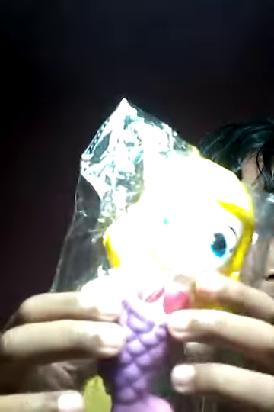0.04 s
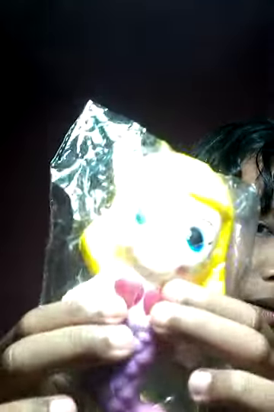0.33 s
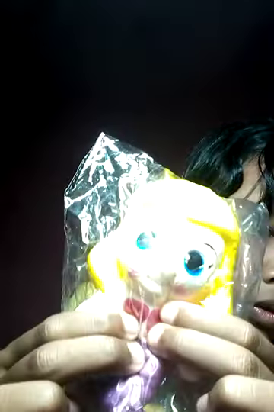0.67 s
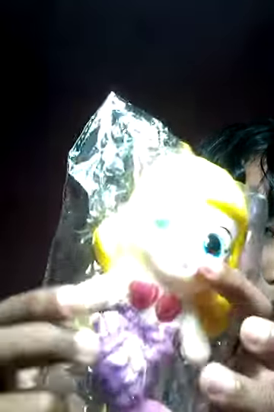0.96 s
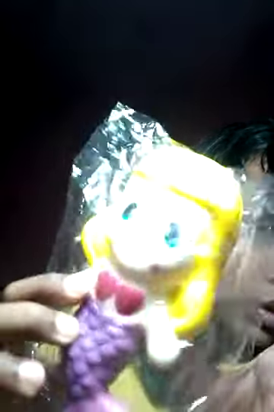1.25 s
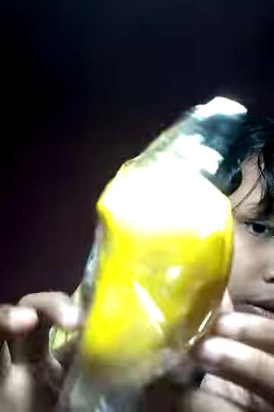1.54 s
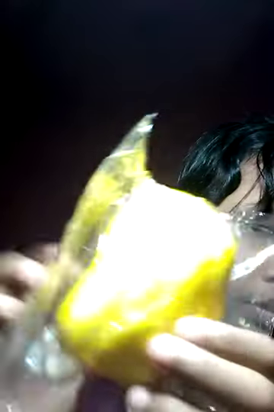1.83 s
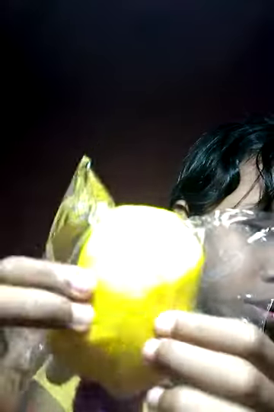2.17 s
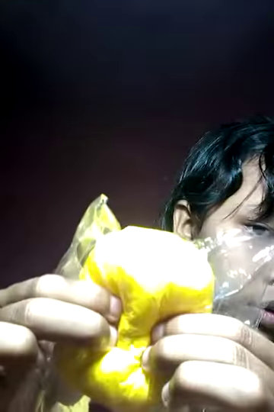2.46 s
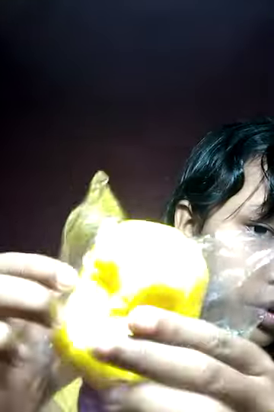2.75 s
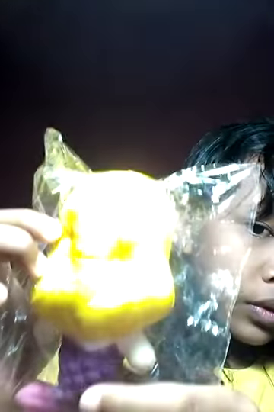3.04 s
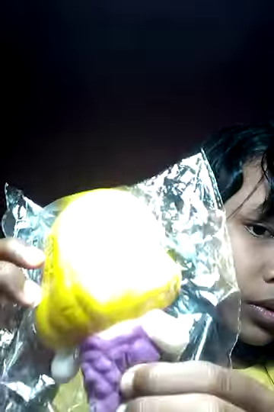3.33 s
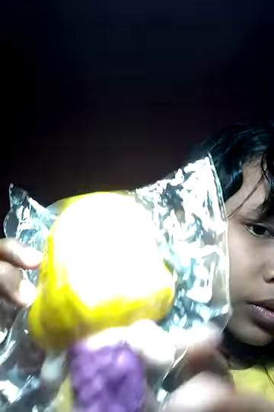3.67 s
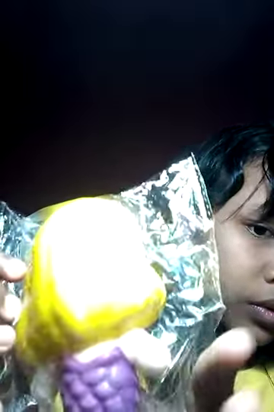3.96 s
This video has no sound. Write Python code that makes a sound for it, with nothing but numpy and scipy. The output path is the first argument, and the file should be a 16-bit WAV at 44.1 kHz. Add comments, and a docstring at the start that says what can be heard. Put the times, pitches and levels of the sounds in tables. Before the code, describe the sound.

A thin plastic bag crinkles close to the microphone from the start, with sharp snaps over dense crackling and a duller rustle as a soft toy inside is squeezed and turned. It swells around 1.7 and 2.1 seconds. At about 2.7 seconds it pauses, leaving a quiet room and a few tiny ticks. The crinkling returns sharply at 3 seconds and surges loudest just before 4 seconds.

```python
"""A thin plastic bag crackles around a soft toy as it is squeezed and turned, close to a small microphone.
Creases buckle in sharp snaps over a dense crackle and the duller rustle of the whole sheet.
Film slides on film, slack patches flop and fingers rub the toy; the hands rest once.
Behind it is a quiet room with a faint mains hum.
The microphone rings near 4 kHz and overloads on the hardest snaps."""
import sys
import numpy as np
from scipy import signal
from scipy.fft import rfft, irfft
from scipy.io import wavfile
from scipy.ndimage import uniform_filter1d

SR = 44100
rng = np.random.default_rng(int(sys.argv[2]) if len(sys.argv) > 2 else 0)


def store_pcm(level_fs):
    """Save levels as 16-bit WAV."""
    pcm = np.round(np.clip(level_fs, -1, 1) * 32767).astype(np.int16)
    wavfile.write(sys.argv[1], SR, np.atleast_2d(pcm).T)


N = 176400

# colour of the quiet room: frequency_hz, relative_db
ROOM_TONE_COLOUR = [(30, -19), (70, -16), (110, -8), (250, 4), (500, 1.5), (720, 2), (900, -2), (1200, 3),
                    (1900, -9.5), (4200, -19), (8000, -30), (16000, -18)]
# how long the walls reverberate: frequency_hz, t60_s
ROOM_DECAY = [(150, 0.5), (1000, 0.32), (4000, 0.17), (9000, 0.15), (16000, 0.18)]
# fingers rubbing the toy through the bag: start_s, length_s, peak_db
FINGER_RUBS = [(.96, 0.17, -40), (1.245, .04, -44), (1.692, .11, -45), (2.06, 0.098, -40)]
# dull colour of that rubbing: frequency_hz, relative_db
RUB_COLOUR = [(30, -37), (100, -14), (170, -4.5), (300, 1), (500, -1), (1000, -20), (4000, -50)]
# hiss of film sliding on film: frequency_hz, relative_db
SLIDE_COLOUR = [(30, -46), (150, -7), (700, -1.5), (1300, -3.5), (2000, -1.5), (3000, 0.5), (4200, -1.5),
                (5500, 1), (8500, 1), (11000, -8), (16000, -15)]
# broad patches of film flopping under the fingers: start_s, peak_db, pitch_hz
FILM_FLOPS = [(.598, -28, 736), (.864, -33, 294), (1.029, -29, 530), (1.043, -31, 270), (1.147, -27, 667),
              (1.248, -27.5, 328), (2.066, -22, 630), (2.109, -23, 720), (2.982, -25.5, 706),
              (3.001, -23.5, 402), (3.027, -27.5, 216), (3.2, -26.5, 695), (3.558, -23.5, 356),
              (3.562, -22.5, 650)]
# a buckling crease as the close microphone hears it: frequency_hz, relative_db
CREASE_COLOUR = [(30, -51), (100, -33), (200, -25.5), (400, -17), (550, -12.5), (720, -10), (850, -13),
                 (1300, -3.5), (1650, -15), (2000, -24), (2400, -8.5), (2750, -13.5), (3200, -6.5),
                 (3750, -1), (4400, 3), (5100, -9), (6400, -10.5), (8600, -8.5), (10000, -16), (11500, -22),
                 (13000, -22.5), (16000, -36.5)]
# how hard the bag is crumpled, in relative levels: time_s, crackle_db, rustle_db
CRUMPLE_EFFORT = [(0.0, -30.5, -40.5), (0.091, -36.5, -50), (0.135, -43.5, -44), (0.165, -32.5, -48),
                  (0.239, -17.5, -24.5), (0.278, -27, -40), (0.349, -29.5, -42), (0.364, -24.5, -36),
                  (0.454, -27, -40.5), (0.599, -27, -31.5), (0.678, -28, -44.5), (0.753, -20.5, -34.5),
                  (0.803, -25.5, -38.5), (0.838, -17, -32.5), (0.968, -25, -37.5), (1.052, -23.5, -35),
                  (1.122, -27.5, -43.5), (1.147, -28.5, -36), (1.227, -35, -45), (1.262, -25.5, -31.5),
                  (1.292, -26.5, -38), (1.377, -36, -45), (1.432, -32.5, -37), (1.527, -25, -36.5),
                  (1.576, -30.5, -42), (1.586, -27, -35), (1.636, -18, -32), (1.754, -15.5, -25),
                  (1.791, -20, -35.5), (1.826, -20, -28), (1.841, -24, -37), (1.921, -31.5, -51),
                  (1.937, -26, -31), (1.956, -32, -42.5), (2.12, -17.5, -27), (2.135, -21.5, -35),
                  (2.175, -21.5, -31), (2.19, -27, -39), (2.23, -23.5, -31), (2.295, -27.5, -38),
                  (2.484, -29.5, -42), (2.529, -30.5, -33.5), (2.545, -26, -50), (2.574, -32.5, -37),
                  (2.655, -20, -29.5), (2.694, -50, -44), (2.699, -65, -70), (2.963, -54, -55),
                  (2.968, -42, -58), (2.985, -22, -30.5), (3.026, -16.5, -28.5), (3.113, -29, -42.5),
                  (3.128, -23.5, -29), (3.178, -30.5, -41.5), (3.198, -27, -33), (3.228, -32.5, -39),
                  (3.342, -34, -53), (3.357, -25.5, -33), (3.397, -35.5, -42), (3.497, -30, -42),
                  (3.524, -33.5, -46), (3.556, -19, -31), (3.67, -20, -30), (3.79, -27.5, -35.5),
                  (3.9, -35, -43), (3.95, -33, -35), (3.976, -21.5, -27), (3.99, -6, -20.5),
                  (4.0, -7.5, -20.5)]
# single large creases, in relative levels: start_s, level_db, body_db, treble_db
CREASE_SNAPS = [(0.029, -26, -24, 1), (0.041, -7, -36.5, -21), (0.0682, -31, -15, -18),
                (0.1441, -20, -9, -28), (0.1639, -16, -11, -11), (0.171, -8, -9.5, -5.5),
                (0.1788, -10, -22, -5), (0.253, -12.5, -14, -3), (0.2879, -21.5, -14, -2),
                (0.3353, -15.5, -5, -8), (0.353, -19.5, -1, -16), (0.3574, -21, -9, -16),
                (0.3823, -13.5, -15, -11), (0.3878, -13, -6, -4), (0.4027, -14, -10, -1),
                (0.44, -11.5, -8.5, -3.5), (0.4954, -15.5, -20, -18), (0.5294, -21, -12, -12),
                (0.5359, -17.5, -6, -8), (0.5597, -14.5, -9, -5), (0.5643, -15, -17, -5),
                (0.5714, -10, -12.5, -10), (0.6312, -21, -17, 9), (0.6554, -12, -21, -9),
                (0.6808, -20.5, -21, -17), (0.7274, -12.5, -6.5, -13), (0.744, -14.5, -16, -18),
                (0.7544, -15, -6, 0), (0.7673, -8, -13, -0.5), (0.796, -6.5, -19, -11),
                (0.799, -11.5, -37, -16), (0.8273, -13, -14, -12), (0.834, -16, -12, -3),
                (0.8927, -25, -21, -5), (0.9345, -10.5, -9.5, -5), (0.9425, -17, -14, -11),
                (0.9886, -15.5, -5, -5), (1.0343, -21.5, -3, -6), (1.0451, -9, -19, -16),
                (1.0718, -14, -7, -2.5), (1.089, -20, -23, -13), (1.0946, -25.5, -1, -8),
                (1.103, -13.5, -14, -3), (1.1527, -18, -15, -10), (1.1668, -26, -4, -1),
                (1.1803, -13.5, -10, -9), (1.199, -14.5, -16, -9), (1.249, -19.5, -10, -8),
                (1.2603, -14, -21, -18), (1.2815, -13.5, -18, -3.5), (1.2927, -18, -11, -4),
                (1.306, -13, -30, -13), (1.3157, -16.5, -23, -3), (1.3829, -18.5, -14, -6),
                (1.3916, -28, -20, 0), (1.3994, -31, -10, -1), (1.4192, -20, -8, -3),
                (1.4246, -18.5, -15, -2), (1.4297, -19, -21, -4), (1.4543, -22, -13, -4),
                (1.4661, -8, -12.5, -6.5), (1.4704, -19, -19, -6), (1.5237, -11, -11, -10),
                (1.582, -18.5, -28, -2), (1.6054, -14, -10, -5), (1.656, -17, 0, 1), (1.67, -12, -22, -9),
                (1.6872, -17, -21, -2), (1.7019, -8, -8, -3), (1.7343, -12, -14, -11),
                (1.772, -11, -19, -8), (1.778, -12.5, -24, -24), (1.782, -12, -21, -21),
                (1.8229, -10, -11, -23), (1.8367, -16, -16, -16), (1.8603, -12.5, -29, -13),
                (1.8669, -20, -16, -13), (1.8781, -17.5, -9, -14), (1.889, -23, -25, -6),
                (1.911, -20, 3, -10), (1.9141, -19, -18, -11), (1.9273, -21, -18, 2),
                (1.9312, -19, -26, -20), (1.936, -11.5, -30, -9.5), (1.9751, -16, -1, -11),
                (1.984, -16.5, -4, -17), (2.0647, -10, -4.5, -5), (2.0706, -13, -23, -11),
                (2.0778, -15, -18, -20), (2.0963, -12, -9, -10), (2.121, -10, -10, -10),
                (2.1283, -8.5, -13, -12), (2.1696, -16.5, 1, -10), (2.1845, -13.5, -14, -10),
                (2.21, -13, -22, -16), (2.2177, -14.5, -28, -16), (2.2437, -21, -13, -1),
                (2.2847, -19, -13, -9), (2.2899, -23, -14, -21), (2.3242, -15.5, -9, -12),
                (2.3286, -22, -17, -7), (2.3702, -16.5, -20, -6), (2.3823, -20, -24, -2),
                (2.3905, -13.5, -10, -4), (2.4034, -17, -14, -3), (2.4846, -19, -17, -10),
                (2.4876, -16.5, -7, -7.5), (2.5016, -19, -21, -11), (2.5458, -19, -16, -7),
                (2.547, -19.5, -12, -9), (2.5563, -14.5, -12, 5), (2.562, -7, -19, -14),
                (2.5769, -21, 0, -5), (2.6152, -12, -10, -4), (2.6215, -12.5, -14, 2),
                (2.6248, -13.5, -16, -8), (2.6371, -17, -10, -22), (2.6693, -12, -12, -8),
                (2.6777, -18, -16, -1), (2.6825, -21, -10, -3), (2.866, -33, -21, -7),
                (2.9353, -36, -10, -15), (2.957, -29, -2, -8), (2.9819, -17.5, 2, -19),
                (2.9983, -13, 2, -2), (3.0265, -8.5, 5.5, 6.5), (3.1179, -18, -16, -3),
                (3.13, -21, -11, 11), (3.1488, -15, -21, -5), (3.2047, -20, -10, -7),
                (3.252, -16.5, -9, -8), (3.2549, -13.5, -19, -18), (3.26, -14.5, -32, -6),
                (3.2733, -28, -5, -4), (3.2859, -10, -13, 0.5), (3.3062, -26, -19, 0),
                (3.3158, -20.5, -25, -3), (3.3527, -15, -24, -11), (3.3637, -19, -8, -3),
                (3.3879, -22, -25, 1), (3.4105, -17, -5.5, -5), (3.4437, -21, -12, -16),
                (3.463, -27.5, -1, -9), (3.4937, -24, -6, -13), (3.5441, -13, -29, -4),
                (3.5714, -14.5, -18, -2), (3.577, -13, -33, -14), (3.5846, -6.5, -39, -14),
                (3.6215, -17, -20, 12), (3.6335, -10, -19, -16), (3.6581, -18, -6, -6),
                (3.6645, -3, -16, -13.5), (3.6992, -14, -7, -9), (3.7279, -14.5, -12, -21),
                (3.7509, -19, -10, -10), (3.7592, -21, -26, -10), (3.764, -17.5, -16, -9),
                (3.8117, -13.5, -28, -11), (3.8437, -17.5, -18, -8), (3.8932, -22.5, -20, 19),
                (3.92, -32, -15, 3), (3.929, -29, -15, 3), (3.9563, -14.5, -11, -10)]

BODY_EDGE_HZ, TREBLE_EDGE_HZ = 2090, 5660  # the microphone's ring lies between these
USUAL_EFFORT_DB = -26.5  # crackle_db in ordinary handling


def amp(db):
    """Decibels to gain."""
    return 10 ** (np.asarray(db) / 20)


def unit(x):
    """Scales to an energy of one."""
    return x / np.sqrt(np.sum(x ** 2) + 1e-20)


def read(points, hz):
    """Reads a table along a log-frequency axis."""
    table_hz, value = np.transpose(points)
    return np.interp(np.log(hz + 1), np.log(table_hz), value)


def add(mix, start_s, sound):
    """Mixes a sound in at a time."""
    part = mix[round(start_s * SR):][:len(sound)]
    part += sound[:len(part)]


def noise(colour):
    """Steady noise of a given colour, at an RMS of one."""
    spectrum = rfft(rng.standard_normal(N)) * amp(read(colour, np.fft.rfftfreq(N, 1 / SR)))
    return np.sqrt(N) * unit(irfft(spectrum, N))


def steadied(x, span_s):
    """Evens out the slow level of a train of clicks."""
    window = signal.windows.hann(int(span_s * SR))
    power = abs(signal.oaconvolve(x ** 2, window / window.sum(), "same"))
    return x / np.sqrt(power + 1e-3 * np.mean(x ** 2))


def effort():
    """How hard the hands work at each sample: crackle_db, rustle_db."""
    time_s, crackle_db, rustle_db = np.transpose(CRUMPLE_EFFORT)
    t = np.arange(N) / SR
    return np.interp(t, time_s, crackle_db), np.interp(t, time_s, rustle_db)


def room_tone(noise_db=-52, hum_db=-69, hum_hz=100):
    """The room behind the bag: soft steady noise and a faint mains hum."""
    hum = np.sqrt(2) * np.sin(2 * np.pi * hum_hz * np.arange(N) / SR)
    return amp(noise_db) * noise(ROOM_TONE_COLOUR) + amp(hum_db) * hum


def reflections(direct, near_db=-15, near_decay_s=0.002, walls_db=-21.5):
    """The close sound, quick reflections off the hands and toy, then a faint tail from the walls."""
    t = np.arange(SR // 2) / SR
    near, far = rng.standard_normal((2, len(t))) * (rng.random((2, len(t))) < .1)
    early = near * (t > .001) * np.exp(-t / near_decay_s)
    hz, frame_s, spectra = signal.stft(far * (t > .004), SR, nperseg=256)
    decay = amp(-60 * frame_s / read(ROOM_DECAY, hz)[:, None])
    tail = signal.istft(spectra * decay, SR, nperseg=256)[1][:len(t)]
    response = amp(near_db) * unit(early) + amp(walls_db) * unit(tail)
    return direct + signal.fftconvolve(direct, response)[:N]


def finger_rubbing():
    """Dull friction on the toy that swells and fades with each shift of the grip."""
    t = np.arange(N) / SR
    level = sum(amp(peak_db) * np.sin(np.pi * np.clip((t - start_s) / length_s, 0, 1))
                for start_s, length_s, peak_db in FINGER_RUBS)
    return level * noise(RUB_COLOUR)


def film_sliding(usual_db=-38, db_per_effort_db=0.64):
    """Film rubs on film and fills the gaps between creases while the hands move."""
    effort_db, _ = effort()
    hiss_db = usual_db + db_per_effort_db * (effort_db - USUAL_EFFORT_DB)
    return amp(np.minimum(hiss_db, effort_db)) * noise(SLIDE_COLOUR)


def film_flops(rise_s=0.0022):
    """Slack film flops over with a low pop, a few cycles long."""
    out, t = np.zeros(N), np.arange(SR // 20) / SR
    envelope = t / rise_s * np.exp(1 - t / rise_s)
    for start_s, peak_db, pitch_hz in FILM_FLOPS:
        add(out, start_s, amp(peak_db) * envelope * np.sin(2 * np.pi * (pitch_hz * t + rng.random())))
    return out


def crease(body_db, ring_db, treble_db, ripple_db, shiver, shiver_s, size=1024):
    """One buckle: a click with a brief shiver of the film, in a colour of its own."""
    hz, t = np.fft.rfftfreq(size, 1 / SR), np.arange(size) / SR
    ripple = uniform_filter1d(uniform_filter1d(rng.standard_normal(len(hz)), size=22), size=12)
    detune = np.exp(.04 * rng.standard_normal())
    colour = amp(read(CREASE_COLOUR, hz * detune) + ripple_db * ripple / ripple.std())
    click = t == t[10]
    flutter = unit(rng.standard_normal(size) * t * np.exp(-t / shiver_s))
    push = rfft(click + shiver * flutter)
    body = 1 / (1 + (hz / BODY_EDGE_HZ) ** 12)
    treble = 1 - 1 / (1 + (hz / TREBLE_EDGE_HZ) ** 12)
    bands = (body_db, body), (ring_db, abs(1 - body - treble)), (treble_db, treble)
    gain = sum(amp(db) * colour * band / np.linalg.norm(colour * band * push) for db, band in bands)
    # minimum phase keeps the attack sharp, with all the ringing after it
    log_gain = np.log(gain / gain.max() + 1e-5)
    mirrored = np.r_[log_gain, log_gain[-2:0:-1]]
    response = np.exp(np.conj(signal.hilbert(mirrored)))[:len(hz)]
    return rng.choice([-1, 1]) * unit(irfft(response * push))


def bag_crumpling(usual_per_s=1050, doubling_db=7, size_spread_db=5.5, kinds=48):
    """Swarms of small creases, more with harder crumpling: each crackles and shakes the sheet around it."""
    crackle_db, rustle_db = effort()
    creases_per_s = usual_per_s * 2 ** ((crackle_db - USUAL_EFFORT_DB) / doubling_db)
    buckles = rng.random(N) < creases_per_s / SR
    sizes = amp(size_spread_db * np.minimum(rng.exponential(1, N), 3.19))
    kind = rng.integers(0, kinds, N)
    crackle, rustle = np.zeros((2, N))
    for k in range(kinds):
        train = buckles * sizes * (kind == k)
        bright = crease(body_db=-35, ring_db=0, treble_db=-7, ripple_db=2.5, shiver=0.88, shiver_s=.00036)
        dull = crease(body_db=0, ring_db=-30, treble_db=-55, ripple_db=3.5, shiver=1.1, shiver_s=.00067)
        crackle += signal.oaconvolve(train, bright)[:N]
        rustle += signal.oaconvolve(train, dull)[:N]
    crackle = amp(crackle_db - 0.5) * steadied(crackle, span_s=0.1)
    rustle = amp(rustle_db - 1.5) * steadied(rustle, span_s=0.067)
    return crackle + rustle


def bag_snaps(energy_span_s=.003):
    """The large creases, each giving way at its own moment right by the microphone."""
    out = np.zeros(N)
    for start_s, level_db, body_db, treble_db in CREASE_SNAPS:
        snap = crease(body_db=body_db - 1, ring_db=0, treble_db=treble_db + 0.5,
                      ripple_db=2.0, shiver=1.4, shiver_s=.00036)
        add(out, start_s, amp(level_db - 1) * np.sqrt(energy_span_s * SR) * snap)
    return out


def scene():
    """The bag up close in the quiet room, in mono."""
    bag = bag_crumpling() + film_sliding() + bag_snaps() + film_flops() + finger_rubbing()
    return (room_tone() + reflections(bag))[None]


def record(dry):
    """The microphone flattens the tallest peaks, a little unevenly, and loses the highest treble."""
    oversampled = signal.resample_poly(dry, 3, 1, axis=1)
    ceiling = 0.71 * (1 + 0.0069 * np.sign(oversampled))
    flattened = oversampled / (1 + (oversampled / ceiling) ** 6) ** (1 / 6)
    overloaded = signal.resample_poly(flattened, 1, 3, axis=1)
    lowpass = signal.firwin(511, cutoff=16100, window=("kaiser", 9), fs=SR)
    return signal.oaconvolve(overloaded, lowpass[None], "same")


dry = scene()
out = record(dry)
store_pcm(out)
```